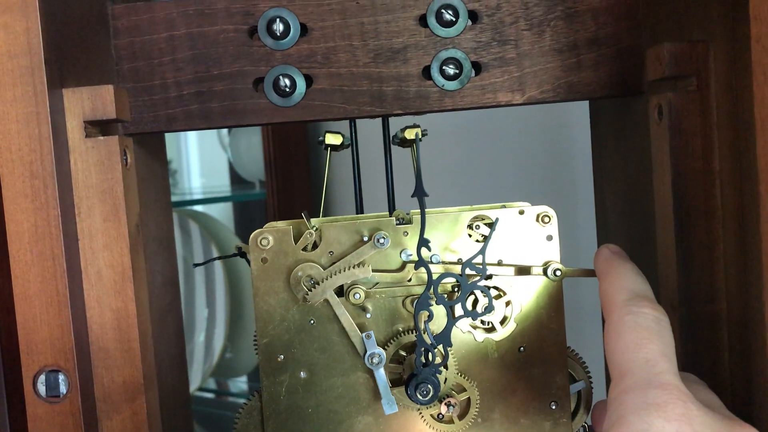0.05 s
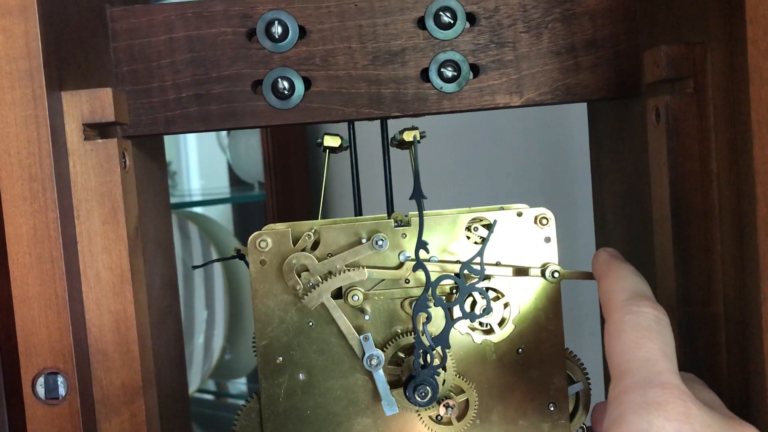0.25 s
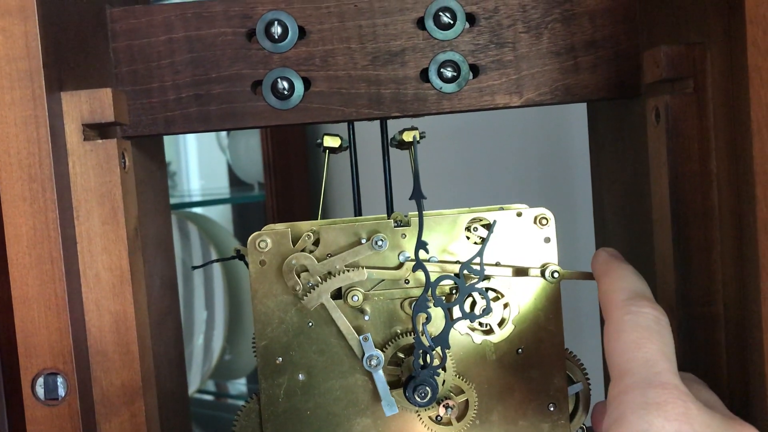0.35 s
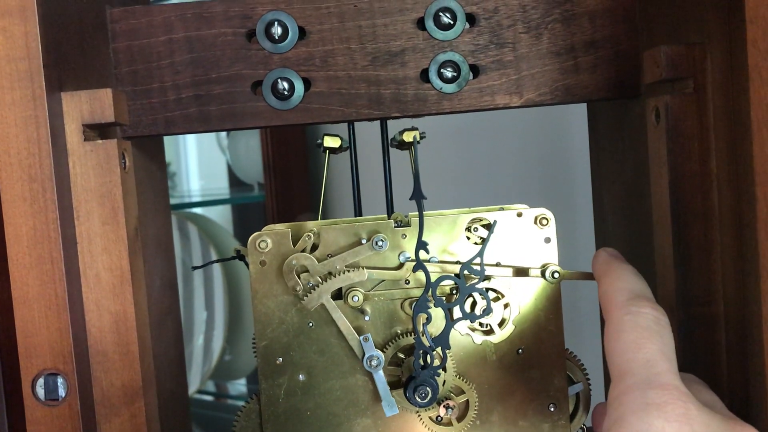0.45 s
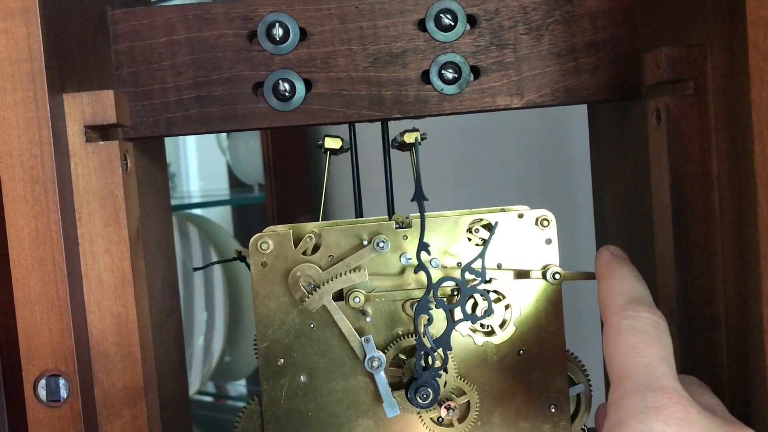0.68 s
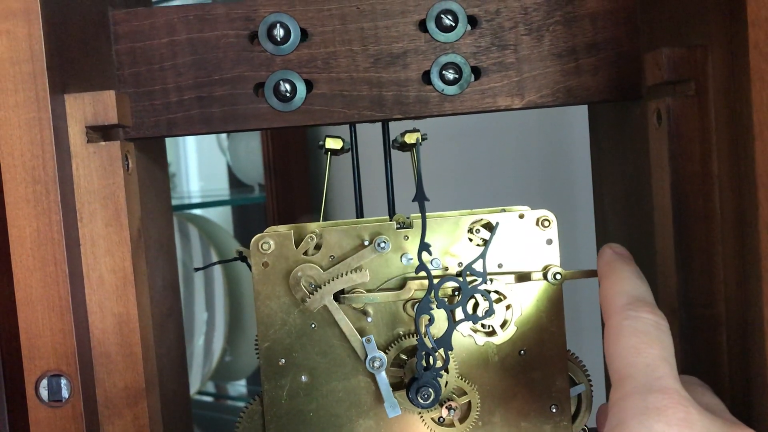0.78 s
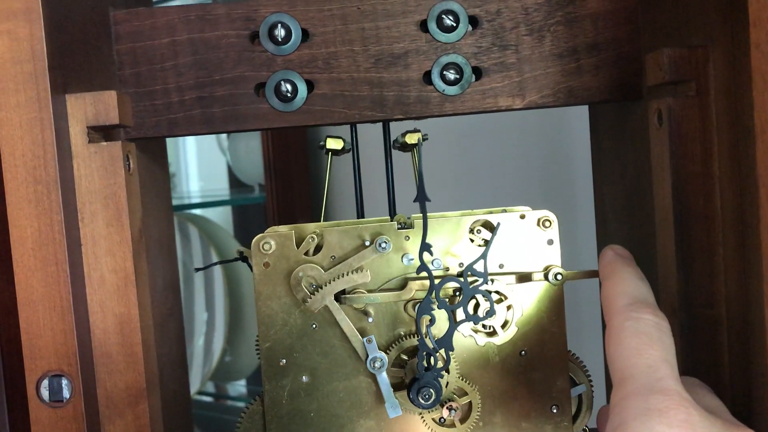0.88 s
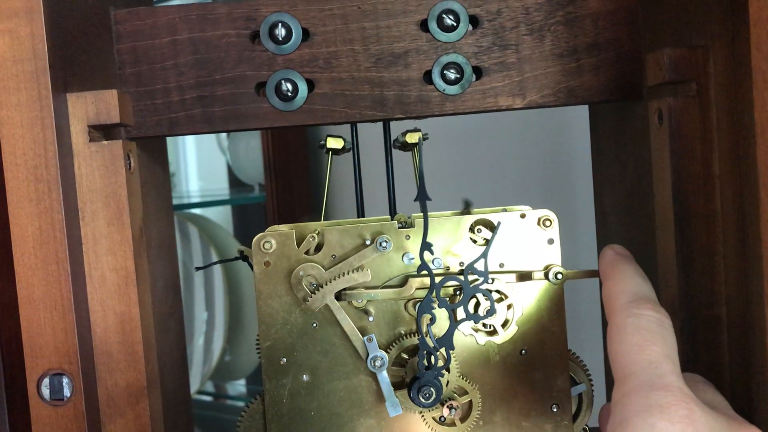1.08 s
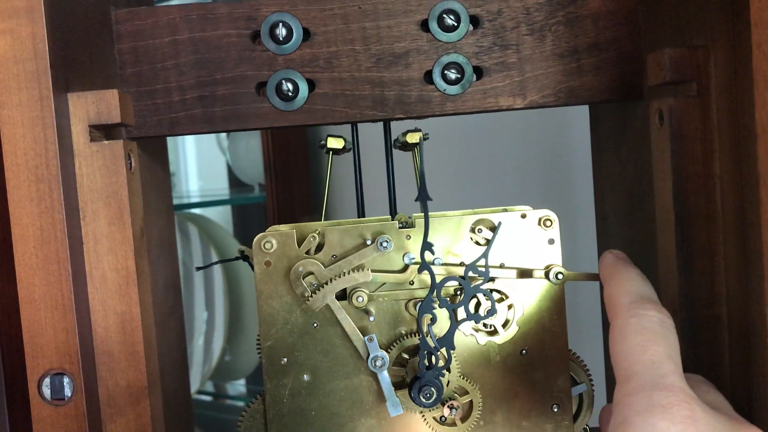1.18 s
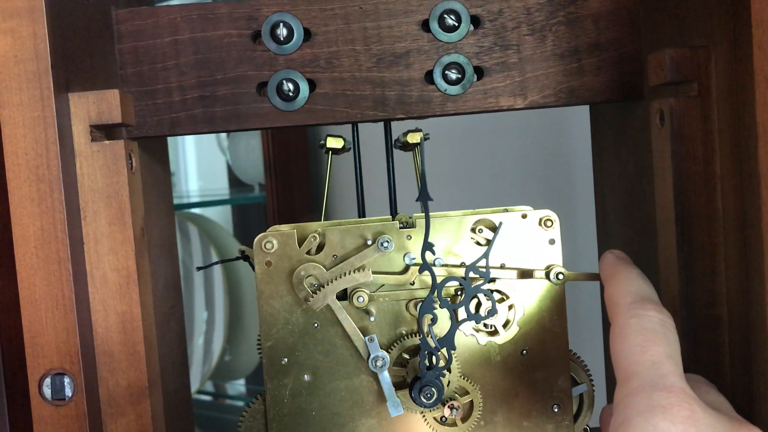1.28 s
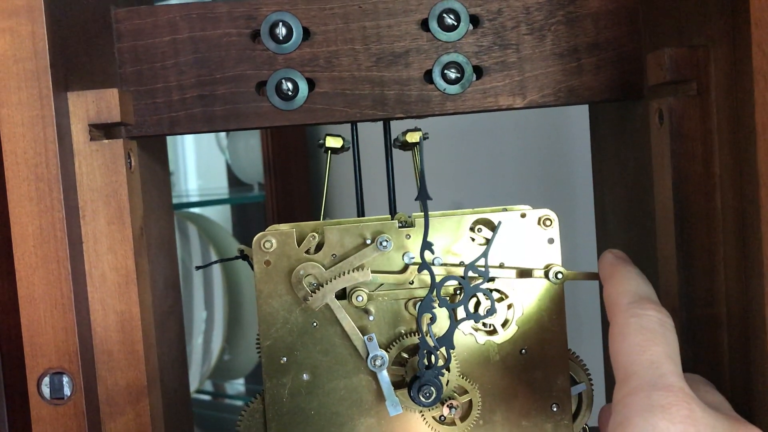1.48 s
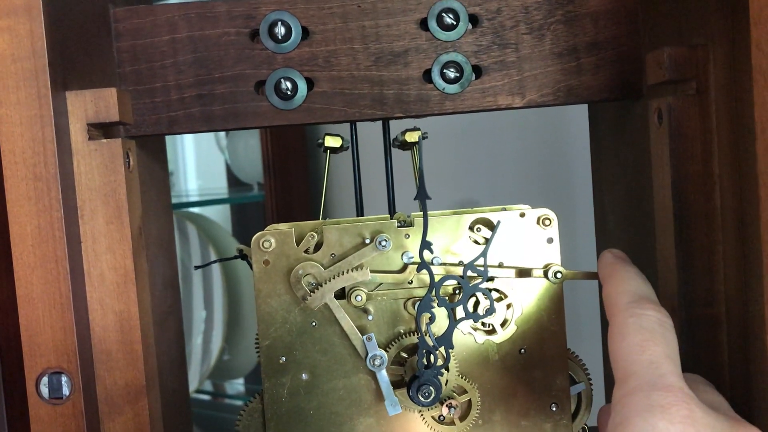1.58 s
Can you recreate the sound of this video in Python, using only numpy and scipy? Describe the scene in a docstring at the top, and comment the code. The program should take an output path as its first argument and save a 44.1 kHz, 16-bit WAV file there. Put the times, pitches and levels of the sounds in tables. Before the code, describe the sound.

Sharp metallic clicks of a clock movement as its lever is worked in a quiet room.

```python
"""Clicking clockwork

A finger works the lever of a brass clock movement in its wooden case, in a quiet room.
Steel parts snap and bounce: each click is a gritty crack plus the ring of the parts it strikes,
and the case booms softly. Freed wheels flutter faintly between and after the clicks, over hum and hiss."""
import sys
import numpy as np
from scipy import signal
from scipy.fft import rfft, irfft
from scipy.io import wavfile
from scipy.ndimage import uniform_filter1d

SR = 44100
rng = np.random.default_rng(int(sys.argv[2]) if len(sys.argv) > 2 else 0)


def digitize_waveform(pressure):
    """Quantize a signal to 16-bit integers and store it at the path in sys.argv[1].

    Rows of a 2-D input are taken as channels; values are limited to [-1, 1].
    """
    field = np.atleast_2d(pressure).T
    bounded = np.clip(field, -1, 1)
    quanta = np.round(bounded * 32767).astype(np.int16)
    wavfile.write(sys.argv[1], SR, quanta)


N = 72765
T = np.arange(N) / SR
HZ = np.maximum(np.fft.rfftfreq(N, 1 / SR), 1)
RING_ATTACK_S = 0.0017

# The snaps: start_s, hold_s, fade_s, six crack_db (low to high pitch), six ring_db (one per metal part),
# knock_db, case_db, knock_hz
CLICKS = [ (.1400, 0.0014, 0.11, -97, -65, -68, -88, -62.5, -74, -63, -56, -66, -70, -62.5, -86, -68.5, -73.5, 611),
          (0.2245, 0.0074, 0.039, -78, -70, -53, -56, -48, -52.5, -63.5, -44, -68, -79, -61, -80, -76, -102, 580),
          (0.2446, 0.0078, 0.027, -50, -53, -45, -40.5, -37, -41, -39.5, -41, -55, -64, -60, -43, -52, -51.5, 638.4),
          (.2706, 0.0029, 0.035, -55, -56, -46.5, -40.5, -40.5, -44, -47, -46, -47, -66, -54, -46, -52, -59.5, 646.6),
          (0.2885, 0.0042, 0.05, -47, -64, -47, -47.5, -49, -54, -54, -52, -78, -56, -80, -59, -60, -59.5, 645),
          (0.3112, 0.0063, 0.02, -58.5, -60.5, -63, -56.5, -62, -79, -71, -62, -62, -88, -62, -56, -74, -78, 600),
          (.3362, 0.0025, 0.021, -67, -69, -56, -69, -83, -74, -80, -80, -87, -80, -74, -65, -71, -64.5, 655),
          (0.6369, 0.0045, 0.034, -72, -49, -51.5, -44.5, -43, -43.5, -59, -53, -36.5, -80, -76, -40, -70.5, -59.5, 699),
          (.7531, 0.0044, 0.029, -56, -68, -62, -65, -55, -52, -67, -67, -63, -79, -75, -71, -62, -79, 608),
          (.7650, 0.0068, 0.047, -60, -68.5, -65, -59, -56, -78, -59, -72, -76, -84, -88, -61, -62.5, -62, 552),
          (0.7796, 0.0014, 0.01, -54, -70, -76, -63, -66, -65, -71, -79, -81, -79, -92, -78, -68.5, -67.5, 658),
          (1.016, 0.004, 0.17, -83, -65.5, -70, -62.5, -65.5, -75.5, -75, -67, -95, -104, -59.5, -94, -73.5, -87, 583),
          (1.2114, 0.0057, 0.054, -57.5, -53, -45.5, -47.5, -40, -44.5, -63, -43.5, -70, -38.5, -85, -72, -51.5, -62, 627.3),
          (1.2245, 0.0031, 0.037, -53, -58, -53.5, -45.5, -46.5, -75, -60.5, -51, -78, -86, -68, -74, -52, -80, 597.6),
          (1.3588, 0.0046, 0.043, -66, -58, -69, -52, -54, -51.5, -60.5, -56.5, -58.5, -75, -66.5, -49.5, -50.5, -59, 542)]


def cracks():
    """Each snap scatters through the clockwork as a gritty crack, coloured by the parts it hits hardest."""
    crack_hz = [550, 1000, 1600, 3000, 6000, 12500]  # where the six crack levels apply: pitch_hz
    out = np.zeros(N)
    grit = undb(2.5 * noise(HZ < 2310))  # a fast flicker in level
    grit /= np.sqrt(np.mean(grit ** 2))
    part_peaks = np.array([sum(undb(db) * resonance(hz, width_hz=170) for hz, db, _ in tones)
                           for tones in metal_parts()])
    for start, hold, fade, *levels in CLICKS:
        crack_db, struck = levels[:6], undb(levels[6:12])
        clack = 1 + undb(-1.5) * (struck / np.linalg.norm(struck)) @ part_peaks
        clack /= np.sqrt(uniform_filter1d(clack ** 2, size=4000))  # valleys fall as peaks rise
        bass_cut = HZ ** 2 / (HZ ** 2 + 456 ** 2)
        gain = clack * undb(curve(crack_hz, crack_db)) / np.sqrt(HZ) * bass_cut
        burst = irfft(rfft(grit * noise(np.ones(len(HZ)))) * gain, N)
        strength = np.linalg.norm(undb(crack_db))
        out += strength * burst / burst.std() * envelope(start, 0.00081, hold, fade)
    return out


def metal_parts():
    """Each metal part has its own set of tones."""
    # Tones of each part: pitch_hz, level_db, fade_s
    plate = [(1384, -9, 0.11), (1402, -2.5, 0.07), (1955, -3, 0.088), (2308, -6, 0.079), (2359, -4, 0.12),
             (3508, -2, 0.1), (3523, -3, .06), (3914, -5, 0.04)]
    lever = [(6023, 5, 0.023), (6220, -1.5, 0.021), (7157, -5.5, 0.036), (9510, -0.5, 0.015)]
    rack = [(1414, -15.5, .12), (1502, -7, 0.033), (2390, -2.5, .022), (3216, 3.5, 0.029),
            (3300, -7, 0.065), (5527, -0.5, 0.049), (6390, -0.5, 0.028), (6560, -5.5, .035),
            (7100, 2, 0.016), (8630, -7.5, 0.045)]
    pawl = [(3506, -16, 0.058), (4465, -7.5, 0.11), (5693, -3, 0.073), (5956, -8, 0.041),
            (6300, -1.5, 0.046), (7113, 6, 0.028), (7230, -16, 0.014), (8960, -1.5, 0.022),
            (13230, -3, 0.05)]  # the catch on a toothed wheel
    arm = [(917.5, -5, 0.23), (1913, -7, 0.18), (2210, -3, 0.21), (2910, -3, 0.13), (5320, -6, 0.06)]
    hook = [(1630, -0.5, .06), (3890, -5, 0.022)]
    return plate, lever, rack, pawl, arm, hook


def metal_rings():
    """Every snap sets the six metal parts ringing, each at its own level."""
    return sum(undb(db) * ring(tones, click[0], RING_ATTACK_S)
               for click in CLICKS for tones, db in zip(metal_parts(), click[9:15]))


def wooden_case():
    """The lever lands with a knock, the wooden frame knocks too, and the case booms and swells more slowly into
    a hum."""
    # Tones of the lever's landing knock, whose pitch shifts from snap to snap: pitch_ratio, level_db, fade_s
    knock_tones = [(0.936, -9.5, 0.22), (0.998, -1, 0.14), (1.094, -1, 0.12), (1.27, -12.5, 0.1)]
    # Tones of the frame and the case: pitch_hz, level_db, fade_s
    frame_tones = [(383, -2, 0.29), (414, -0.5, 0.17), (453.3, -7, 0.15)]
    case_tones = [(64.3, -8, 0.38), (161.5, -3.5, 0.81), (168, -3.5, 0.75), (198.3, -0.5, 0.74),
                  (234.4, -14, 1)]
    attack_s = 0.01
    out = np.zeros(N)
    for start, *_, knock_db, case_db, knock_hz in CLICKS:
        boom = undb(-7.5) * noise(resonance(211, width_hz=230))
        boom *= envelope(start, attack_s, hold_s=0.01, fade_s=0.71)
        knock = ring([(knock_hz * ratio, db, fade) for ratio, db, fade in knock_tones], start, attack_s)
        body = ring(frame_tones, start, attack_s) + ring(case_tones, start, attack_s=0.019) + boom
        out += undb(knock_db) * knock + undb(case_db) * body
    return out


def pin():
    """On two hard snaps a small pin sings very high and is damped at once."""
    pings = [(0.638, -37), (1.2094, -37.5)]  # hits on the pin: start_s, level_db
    level = sum(undb(db) * envelope(start, 0.0028, hold_s=0.0095, fade_s=0.026) for start, db in pings)
    return level * np.sin(2 * np.pi * 11987 * T)


def wheels():
    """The spinning wheels tick tooth by tooth, each tick a tiny scrape and a short ring."""
    teeth = [(.327, -54, -58), (.8, -62, -86), (0.862, -60, -85), (0.875, -67, -80), (0.885, -61, -77),
             (1.1, -60, -87), (1.3925, -60, -68), (1.414, -63, -67), (1.4335, -69, -65.5),
             (1.4525, -70, -63), (1.470, -65, -64), (1.4865, -63.5, -64), (1.5035, -66, -61),
             (1.5195, -62, -62.5), (1.535, -59.5, -69), (1.5515, -59.5, -65), (1.567, -69, -63.5),
             (1.583, -73, -66), (1.596, -74, -65), (1.6093, -66, -64), (1.623, -78, -62.5),
             (1.637, -74, -65)]  # teeth catching: start_s, scrape_db, ring_db
    scrape_bands = [(2620, 3300, -13, 0.083), (4400, 1200, -3, 0.0056), (6500, 1000, -7, 0.016)]  # hiss of a tooth: pitch_hz, width_hz, level_db, fade_s
    wheel_tones = [(2255, -1.5, 0.022), (2790, -12, 0.048), (4410, -8, 0.011)]  # ring of a wheel: pitch_hz, level_db, fade_s
    scrape = 0
    for hz, width, band_db, fade in scrape_bands:
        ticks = sum(undb(db) * envelope(start, 0.001, 0.00064, fade) for start, db, _ in teeth)
        scrape += undb(band_db) * noise(resonance(hz, width)) * ticks
    return scrape + sum(undb(db) * ring(wheel_tones, start, RING_ATTACK_S) for start, _, db in teeth)


def room(sound):
    """A small room answers with a short blurred echo, duller as it fades."""
    echo_bands = [(306, -6, 0.46), (930, -3.5, 0.19), (2170, -12.5, 0.36), (5600, -14, 0.32),
                  (12200, -18, 0.24)]  # the echo: pitch_hz, level_db (against the direct sound), fade_s
    centres = [row[0] for row in echo_bands]
    tail = 0
    for only_this_band, (_, db, fade) in zip(np.eye(len(centres)), echo_bands):
        band = np.sqrt(curve(centres, only_this_band))
        part = noise(band) * envelope(0.0039, 0.0024, 0, fade)
        tail += undb(db) * part * np.sqrt(np.mean(band ** 2) / np.sum(part ** 2))
    return signal.fftconvolve(sound, tail)[:N]


def background():
    """A wavering low hum, soft hiss and a very faint high whine."""
    hum_path = [(0.0, 53.3, -61), (0.178, 53.56, -58.5), (0.706, 52.98, -58), (0.738, 54.2, -64.5),
                (0.78, 53.65, -60), (1.576, 53.57, -60.5), (1.65, 53, -60)]  # drift of the hum: time_s, pitch_hz, level_db
    air_shape = [(25, -54), (36, -10.5), (48, 1.5), (70, -5.5), (110, -13.5), (190, -11.5), (400, -16.5),
                 (700, -24), (1400, -28), (4000, -34), (8000, -37), (16000, -39)]  # hiss and room rumble: pitch_hz, relative_db
    times, hz, db = np.array(hum_path).T
    phase = 2 * np.pi * np.cumsum(np.interp(T, times, hz)) / SR
    hum = np.sqrt(2) * undb(np.interp(T, times, db)) * np.sin(phase)
    air = undb(-66) * noise(undb(curve(*np.array(air_shape).T)))
    whine = undb(-91) * noise(resonance(9880, width_hz=120))
    return hum + air + whine


def ring(tones, start, attack_s):
    """The fading tones of one struck part."""
    age = np.maximum(T - start, 0)
    return sum(undb(db) * np.sin(2 * np.pi * hz * age) * envelope(start, attack_s, attack_s, fade)
               for hz, db, fade in tones)


def envelope(start, attack_s, hold_s, fade_s):
    """A level that rises over attack_s and, from hold_s after the start, falls 60 dB every fade_s."""
    age = np.maximum(T - start, 0)
    return np.minimum(age / attack_s, 1) * np.exp(-np.log(1000) * np.maximum(age - hold_s, 0) / fade_s)


def noise(gain):
    """Noise of strength 1, shaped by a gain at each frequency."""
    x = irfft(gain * np.exp(2j * np.pi * rng.random(len(HZ))), N)
    return x / x.std()


def resonance(hz, width_hz):
    """A steep peak in gain around one pitch."""
    return 1 / (1 + ((HZ / hz - hz / HZ) * hz / width_hz) ** 2)


def curve(hz, values):
    """Join points by straight lines on a scale of octaves."""
    return np.interp(np.log(HZ), np.log(hz), values)


def undb(db):
    """Decibels to gain."""
    return 10 ** (np.asarray(db) / 20)


def scene():
    """The clockwork in its room; the cracks echo more than the rings, the pin least."""
    snaps = cracks() + wheels()
    rings = metal_rings() + wooden_case()
    pings = pin()
    echo = room(snaps + undb(-4) * rings + undb(-6) * pings)
    return (snaps + rings + pings + echo + background())[None]


def record(dry):
    """Cut the treble above 16000 Hz."""
    return signal.sosfilt(signal.ellip(10, .2, 70, 16000, fs=SR, output="sos"), dry)


dry = scene()
out = record(dry)
digitize_waveform(out)
```